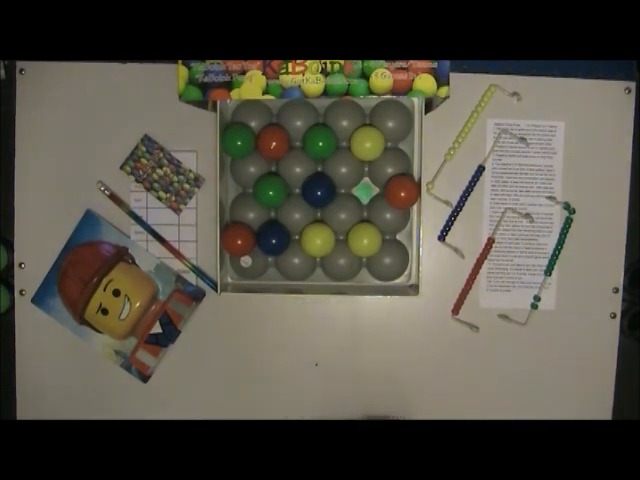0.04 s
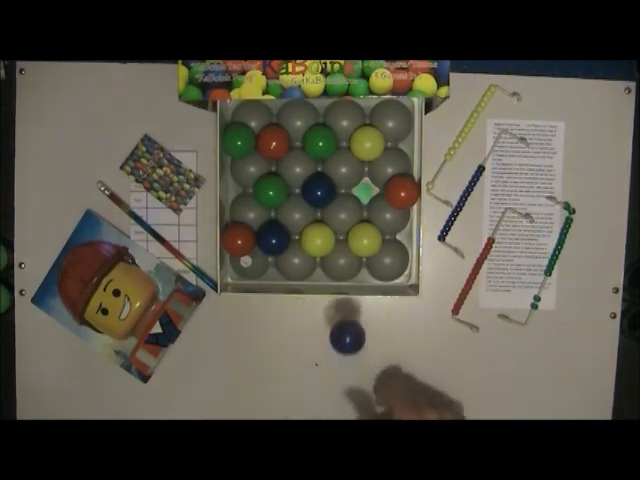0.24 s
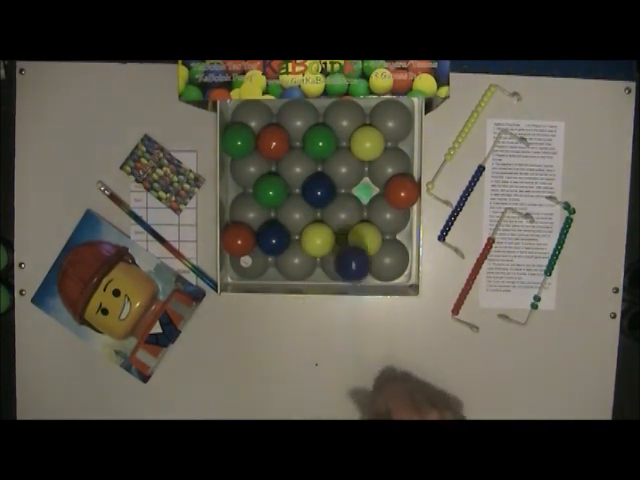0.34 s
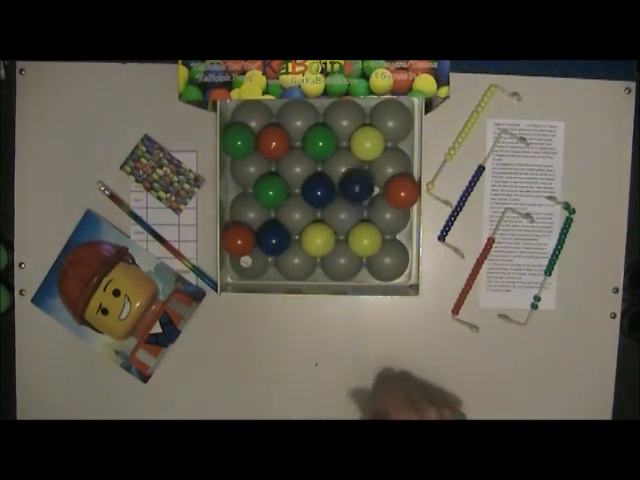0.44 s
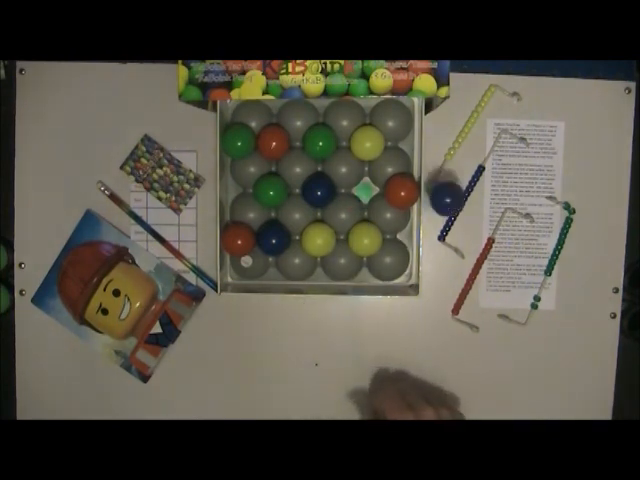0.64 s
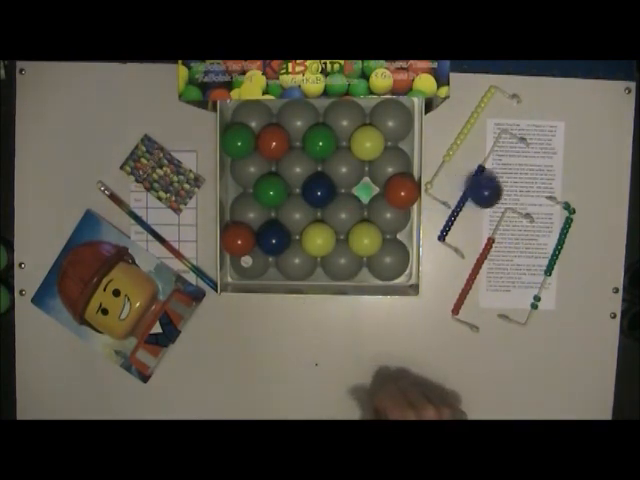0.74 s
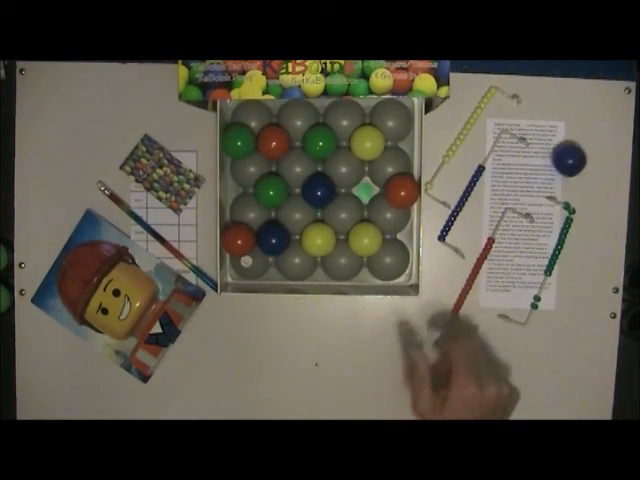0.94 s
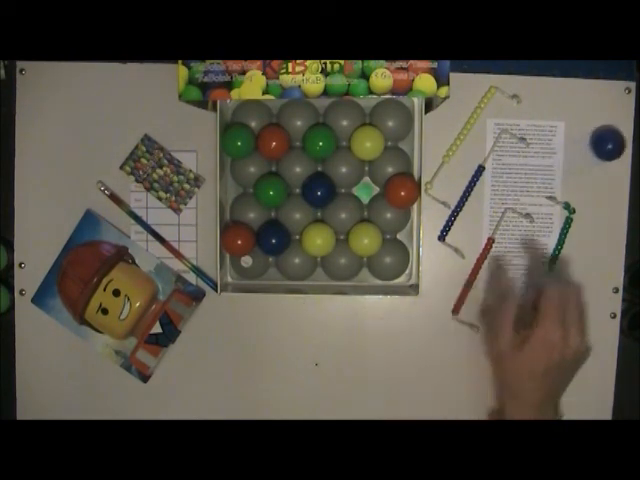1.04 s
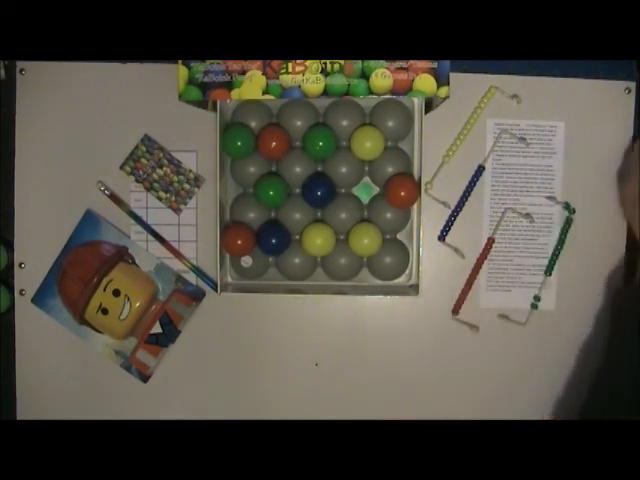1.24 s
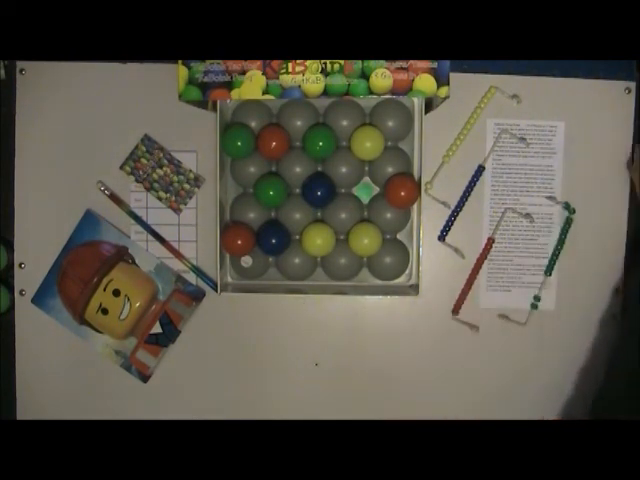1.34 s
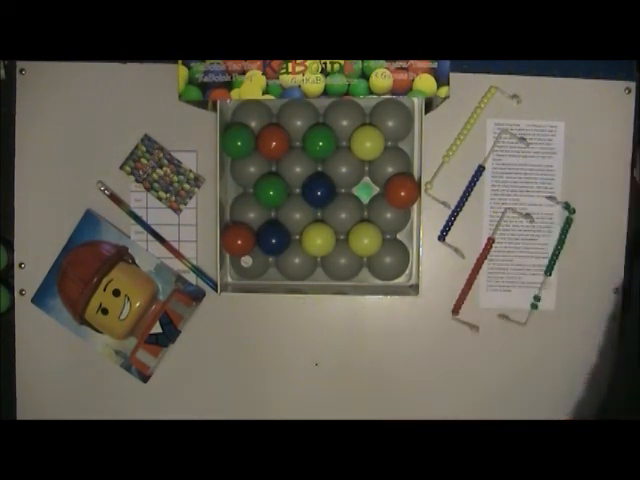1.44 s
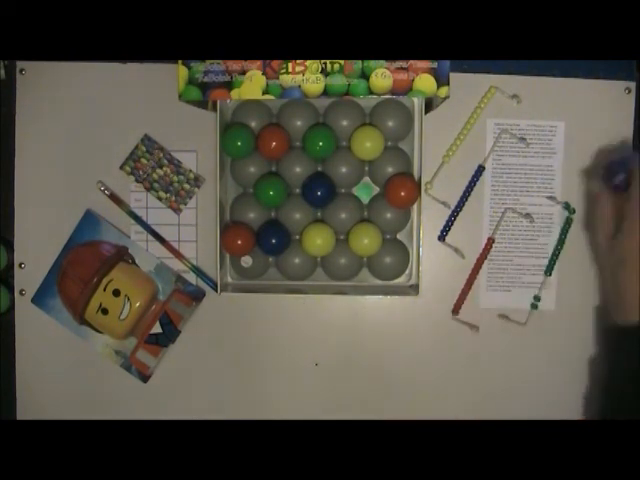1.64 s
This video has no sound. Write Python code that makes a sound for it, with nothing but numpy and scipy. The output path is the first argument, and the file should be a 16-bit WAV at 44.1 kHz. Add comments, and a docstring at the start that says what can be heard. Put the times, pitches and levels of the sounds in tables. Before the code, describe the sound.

A small hard ball bounces sharply on a table at 0.2 seconds, clatters into a plastic tray at 0.5 and knocks another ball at 0.65. It drops out and clacks a plastic stick near 0.8, then patters in quick, fading hops until 1.2. One more bounce leads to three rapid bumps against an edge around 1.4. Faint rustles follow over the small, quiet room's low hum.

```python
"""A small hard ball bounces off a table into a plastic tray of balls, knocks the one at the rim and
drops out. It flicks a plastic stick, patters across the table and bumps an edge three times.
Each blow rings the object's damped modes with a short noise crack, and the ball's shell ticks.
A camera above the table hears it in a small, quiet room with mains hum and faint rustles."""
import sys
import numpy as np
from scipy import signal
from scipy.fft import rfft, irfft, next_fast_len
from scipy.io import wavfile

SR = 44100
rng = np.random.default_rng(int(sys.argv[2]) if len(sys.argv) > 2 else 0)


def output_pcm(signal):
    """Save a mono or channel-first signal as 16-bit PCM at the path in sys.argv[1].

    Samples are clipped to [-1, 1] before scaling.
    """
    pcm = np.clip(np.atleast_2d(signal).T, -1, 1) * 32767
    wavfile.write(sys.argv[1], SR, np.round(pcm).astype(np.int16))


N = 74970


def amp(db):
    """Decibels to gain."""
    return 10 ** (np.asarray(db) / 20)


def along(hz, points):
    """Interpolate (frequency [Hz], value) points on a log-frequency axis."""
    f, value = np.array(points, float).T
    return np.interp(np.log(np.maximum(hz, 1)), np.log(f), value)


def colour(x, points):
    """Minimum-phase filter from (frequency [Hz], gain [dB]) points."""
    n = 2 * next_fast_len(x.shape[-1])
    gain = amp(along(np.fft.rfftfreq(n, 1 / SR), points))
    cepstrum = irfft(np.log(gain))
    cepstrum[1:n // 2] *= 2
    cepstrum[n // 2 + 1:] = 0
    return irfft(rfft(x, n) * np.exp(rfft(cepstrum)))[..., :x.shape[-1]]


def fade(t, t60_s):
    """Exponential decay."""
    return np.exp(-np.log(1000) * t / t60_s)


def pan(db):
    """Stereo gains for a left-minus-right level."""
    return amp(np.array([[db], [-db]]) / 2)


def add(out, at_s, x):
    """Mix x into out at at_s."""
    i = int(round(at_s * SR))
    out[..., i:i + x.shape[-1]] += x[..., :out.shape[-1] - i]


def burst(t, t60_s, spectrum):
    """Dense modes: decaying noise of unit energy, then coloured."""
    x = rng.standard_normal(len(t)) * fade(t, t60_s)
    return colour(x / np.linalg.norm(x), spectrum)


# stereo width (frequency [Hz], side minus mid [dB])
DIFFUSE_WIDTH = [(60, 2), (200, 5), (700, -10.5), (1300, -8.5), (2400, -3), (4400, -1.5), (14000, 2.5)]

def diffuse(n):
    """Stereo noise arriving from all round the room."""
    mid, side = rfft(rng.standard_normal((2, n)))
    ratio = amp(along(np.fft.rfftfreq(n, 1 / SR), DIFFUSE_WIDTH))
    left_right = np.array([mid + ratio * side, mid - ratio * side])
    return irfft(left_right / np.hypot(1, ratio), n)


# room tone (frequency [Hz], gain [dB])
AIR_SPECTRUM = [(15, -64), (25, -5), (84, -30.5), (123, -2.5), (149, -5), (229, -7.5), (427, -15.5),
                (476, -15), (962, -20), (6920, -29.5), (16000, -39)]

def room_tone(air_rms_db=-56.5, hum_hz=120, hum_rms_db=-73):
    """Steady diffuse noise and mains hum."""
    t = np.arange(N) / SR
    air = colour(diffuse(N), AIR_SPECTRUM)
    hum = np.sqrt(2) * np.sin(2 * np.pi * hum_hz * t)
    return amp(air_rms_db) * air / air.std() + amp(hum_rms_db) * hum


# swells (time [s], half length [s], level [dB])
RUSTLE_SWELLS = [(.195, 0.022, -55), (1.533, 0.073, -52.5), (1.604, 0.015, -47.5), (1.665, .025, -54.5)]
# rustle (frequency [Hz], gain [dB])
RUSTLE_SPECTRUM = [(100, 11), (250, -8), (700, -18), (2500, 0.5), (5000, -17.5), (11000, -15), (16000, -18)]

def rustles():
    """Someone moves: faint Gaussian swells of noise."""
    t = np.arange(N) / SR
    noise = colour(diffuse(N), RUSTLE_SPECTRUM)
    envelope = sum(amp(db) * np.exp(-((t - at_s) / half_s) ** 2) for at_s, half_s, db in RUSTLE_SWELLS)
    return envelope * noise / noise.std()


# ball's ring (frequency [Hz], level [dB], t60 [s])
BALL_MODES = [(9540, -28, .04), (10880, -33, .03)]
# shell's contact tick (frequency [Hz], gain [dB])
TICK_SPECTRUM = [(300, -19.5), (2500, -2), (4400, -11), (5400, -11), (7800, -18.5), (9300, 9), (10200, -7),
                 (11500, -4), (13000, 9), (15500, -11), (17000, -22.5)]
RING_S, TICK_T60_S = .2, .0081
BASS_HZ, BODY_HZ, BITE_HZ, TREBLE_HZ = 450, 1370, 3170, 6700
# the walls hear all sides of an object: less of its modes, more of its crack
ROOM_MODES_DB, ROOM_CRACK_DB = -6, 3.5

def strike(hits, modes, crack, crack_db, crack_t60_s):
    """Each blow rings and cracks the object, rings and ticks the ball, and excites the room."""
    t = np.arange(int(RING_S * SR)) / SR
    body, ball = ring(modes, t), ring(BALL_MODES, t)
    impulse = signal.unit_impulse(len(t))
    body_to_walls = amp(ROOM_MODES_DB) * body + amp(crack_db + ROOM_CRACK_DB) * colour(impulse, crack)
    ball_to_walls = amp(ROOM_MODES_DB) * ball + colour(impulse, TICK_SPECTRUM)
    out = np.zeros((2, N))
    for at_s, db, bass_db, bite_db, treble_db, tick_db, pan_db, room_db in hits:
        knock = np.array([body + amp(crack_db) * burst(t, crack_t60_s, crack), body_to_walls])
        tick = np.array([ball + burst(t, TICK_T60_S, TICK_SPECTRUM), ball_to_walls])
        contact = [(BASS_HZ, bass_db), (BODY_HZ, 0), (BITE_HZ, bite_db), (TREBLE_HZ, treble_db)]
        direct, to_walls = amp(db) * (colour(knock, contact) + amp(tick_db) * tick)
        add(out, at_s, pan(pan_db) * direct)
        add(out, at_s, amp(room_db) * signal.fftconvolve(to_walls[None], room_response(), axes=1))
    return out


def ring(modes, t):
    """Damped modes excited together."""
    return sum(amp(db) * np.sin(2 * np.pi * hz * t) * fade(t, t60_s) for hz, db, t60_s in modes)


# diffuse tail (frequency [Hz], level [dB], t60 [s])
TAIL_BANDS = [(102, 0, 0.62), (184, 4, 0.21), (280, 4, 0.17), (530, 3.5, 0.28), (1010, -0.5, 0.3),
              (1670, -2.5, 0.29), (3440, -4, 0.25), (6500, -6, 0.22), (14300, -10, 0.13)]
# near reflections (delay [s], level [dB], pan [dB])
ECHOES = [(.0068, -9.5, 3), (.0112, -19.5, -7.5), (.0195, -22, -10.5)]
# reflection filter (frequency [Hz], gain [dB])
ECHO_SPECTRUM = [(1500, -5.5), (5000, 1), (12000, -16)]

def room_response(tail_s=.4, build_s=.0023):
    """Near reflections and a diffuse tail, new for each spot, that dies sooner in the treble."""
    n = int(tail_s * SR)
    t, hz = np.arange(n) / SR, np.fft.rfftfreq(n, 1 / SR)
    noise = rfft(diffuse(n))
    build = 1 - np.exp(-(t / build_s) ** 2)
    response = np.zeros((2, n))
    for centre_hz, db, t60_s in TAIL_BANDS:
        band = along(hz, [(f, f == centre_hz) for f, _, _ in TAIL_BANDS])  # triangular weight
        envelope = fade(t, t60_s) * build
        response += amp(db) * irfft(noise * band, n) * envelope / np.linalg.norm(envelope)
    echo = colour(signal.unit_impulse(128), ECHO_SPECTRUM)
    for delay_s, db, pan_db in ECHOES:
        add(response, delay_s, amp(db) * pan(pan_db) * echo)
    return response


# bounces (time [s], level [dB], bass [dB], bite [dB], treble [dB], tick [dB], pan [dB], room [dB])
TABLE_HITS = [(.2421, 2, -1.5, 1, -2.5, -7.5, 1.5, -4), (.7702, -11.5, -6, 4.5, -4, -2, 0, 3.5),
              (1.2562, -7, -6, -3, -8, -5, 1.8, 1.5)]
# table top (frequency [Hz], level [dB], t60 [s])
TABLE_MODES = [(205, -28, .08), (502, -17.5, 0.042), (596, -18.5, 0.042), (995, -10.5, 0.017),
               (1130, -23, 0.081), (1396, -8.5, 0.031), (1493, -12, 0.023), (1867, -19, 0.03),
               (2800, -18, .013), (3253, -21.5, 0.02), (4320, -18.5, 0.0065)]
# table's crack (frequency [Hz], gain [dB])
TABLE_CRACK = [(200, 1.5), (1000, 14), (2000, 2.5), (4000, 3), (6500, -1), (10000, 8), (13500, 3),
               (16000, -14)]

def table_bounces():
    """Single bounces ring the table top."""
    return strike(TABLE_HITS, TABLE_MODES, TABLE_CRACK, crack_db=3, crack_t60_s=.011)


# landing (time [s], level [dB], bass [dB], bite [dB], treble [dB], tick [dB], pan [dB], room [dB])
TRAY_HITS = [(.5198, -1, 0.47, -1.5, -4, -16, 1.4, -3), (.5229, -6, 2.1, -3, 5.5, -21, 1.6, 1.5),
             (.5278, -7, 1.4, -20, 2.5, -10, 0.46, -5.5), (.5570, -19, 4.3, -4, 0, 1, 0.44, 6)]
# tray (frequency [Hz], level [dB], t60 [s])
TRAY_MODES = [(182, -23, 0.089), (454, -44, 0.053), (598, -9, 0.026), (940, -12.5, 0.026),
              (1350, -12, 0.024), (1840, -27, 0.09), (2220, -43, 0.036), (3360, -19.5, 0.019),
              (8480, -27, 0.017), (8900, -24.5, 0.0084)]
# tray's crack (frequency [Hz], gain [dB])
TRAY_CRACK = [(70, -8), (200, -6), (1000, 12.5), (2000, 6.5), (4000, 0), (6500, -12), (10000, -9.5),
              (13500, -21), (16000, -21)]

def tray_landing():
    """The ball clatters into the plastic tray of balls."""
    return strike(TRAY_HITS, TRAY_MODES, TRAY_CRACK, crack_db=3.5, crack_t60_s=.032)


# knocks (time [s], level [dB], bass [dB], bite [dB], treble [dB], tick [dB], pan [dB], room [dB])
RIM_BALL_HITS = [(.6416, -10.5, 5.1, -1, 3, -4, 1.2, -4.3), (.6440, -0.5, 0, -11, -14, -40, 1.5, -3.1),
                 (.6838, -24, 11.5, 11.5, -11, -11, 0.23, -3.2)]
# ball at the rim (frequency [Hz], level [dB], t60 [s])
RIM_BALL_MODES = [(238, -26.5, 0.039), (495, -23, 0.054), (595.5, -35, 0.14), (1029, -8, 0.022),
                  (1120, -56, 0.24), (1430, -39, 0.071)]

def rim_ball_knocks():
    """The ball knocks the one at the rim, with a weaker crack from the tray."""
    return strike(RIM_BALL_HITS, RIM_BALL_MODES, TRAY_CRACK, crack_db=-3, crack_t60_s=.034)


# flicks (time [s], level [dB], bass [dB], bite [dB], treble [dB], tick [dB], pan [dB], room [dB])
STICK_HITS = [(.7880, -1, -0.5, -4.8, 1, -51, -.3, -2), (.9863, -31, -41, -2.7, 9.5, -35, 0, -2.5)]
# stick (frequency [Hz], level [dB], t60 [s])
STICK_MODES = [(221.4, -28, 0.14), (612, -25.5, 0.04), (948, -21, 0.047), (1422, -11, 0.03),
               (1790, -23, 0.049), (2945, -21.5, 0.038), (10920, -21, 0.011)]
# stick's crack (frequency [Hz], gain [dB])
STICK_CRACK = [(200, -9.5), (1000, 11.5), (2000, 10.5), (4000, 9.5), (7000, 6), (10000, 0.5), (13500, -1.5),
               (16000, -31)]

def stick_flick():
    """The flicked plastic stick clacks, then clicks faintly."""
    return strike(STICK_HITS, STICK_MODES, STICK_CRACK, crack_db=.5, crack_t60_s=.026)


# hops (time [s], level [dB], bass [dB], bite [dB], treble [dB], tick [dB], pan [dB], room [dB])
PATTER_HITS = [(.9055, -8.5, 2, 6, -2.5, -2, 0, -2), (1.0288, -14, -1.5, 3, -6.5, -10, 0.36, 0.5),
               (1.0594, -17, -1, 1.5, -8.5, -7, 0, -2), (1.0839, -18, 0.5, 2, -5.5, -4.5, 0.027, 0.5),
               (1.0991, -25.5, 9, 3, -1, -3, 0, -2.5), (1.1137, -28.5, 7, 9, 1, -3, 0, -2),
               (1.1249, -31, -11, 5, -1.5, 1, 0, 1.5), (1.1318, -38, 13, 13, 2, 4, 0, 3),
               (1.1485, -40, 13.5, -3, -4, 2, 0, 6), (1.1870, -42.5, 9.5, 3, -2, 4, 0, 11)]
# far part of the table (frequency [Hz], level [dB], t60 [s])
FAR_TABLE_MODES = [(203, -31.5, 0.075), (490, -22, 0.036), (790, -14, 0.012), (1230, -40, 0.023),
                   (1533, -8, 0.026), (1797, -12, 0.027), (1910, -28, 0.037), (3180, -21.5, 0.014)]

def patter():
    """Quick, fading hops across the table."""
    return strike(PATTER_HITS, FAR_TABLE_MODES, TABLE_CRACK, crack_db=1, crack_t60_s=.012)


# bumps (time [s], level [dB], bass [dB], bite [dB], treble [dB], tick [dB], pan [dB], room [dB])
EDGE_HITS = [(1.3633, -2.2, -1.8, 4.5, -5, -3.5, 0.28, 1), (1.3951, -3.6, 0.2, -3, -8, -11.5, 0.81, 1.5),
             (1.4081, -2.2, 0, 1.5, -2.5, -13.5, 1.6, 0)]
# edge (frequency [Hz], level [dB], t60 [s])
EDGE_MODES = [(850, -29, .02), (1170, -15, .028), (1350, -6, .022), (1900, -20, .02), (2800, -24, .012),
              (3800, -24, .011)]
# edge's crack (frequency [Hz], gain [dB])
EDGE_CRACK = [(200, -10), (650, 0), (1200, 16.5), (1550, 13), (2100, 5), (3200, 3.5), (5000, -5),
              (7000, -8.5), (10000, -10.5), (13500, -8), (16000, -21)]

def edge_bumps():
    """Three quick, well-damped bumps against an edge."""
    return strike(EDGE_HITS, EDGE_MODES, EDGE_CRACK, crack_db=3, crack_t60_s=.01)


# what the table top radiates and the walls return (frequency [Hz], gain [dB])
RADIATION = [(45, -28), (110, -20), (195, -4), (280, -13), (380, -4), (1000, 0)]

def scene():
    """All blows, thinned in the bass, over the quiet room."""
    blows = table_bounces() + tray_landing() + rim_ball_knocks() + stick_flick() + patter() + edge_bumps()
    return colour(blows, RADIATION) + room_tone() + rustles()


def record(dry, clip_level=1.31, top_hz=15900):
    """The camera clips, then low-passes."""
    lowpass = signal.ellip(8, .2, 80, top_hz, fs=SR, output="sos")
    return signal.sosfilt(lowpass, np.clip(dry, -clip_level, clip_level))


dry = scene()
out = record(dry)
output_pcm(out)
```